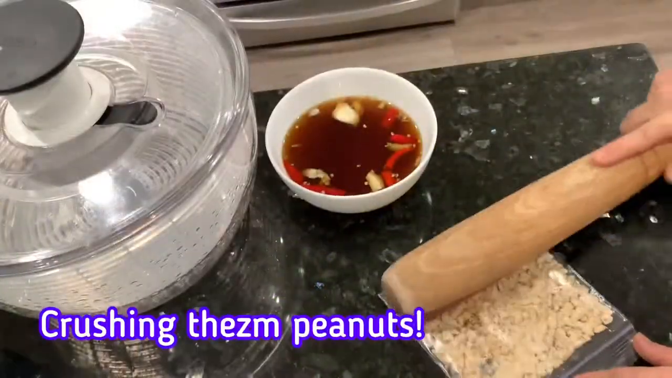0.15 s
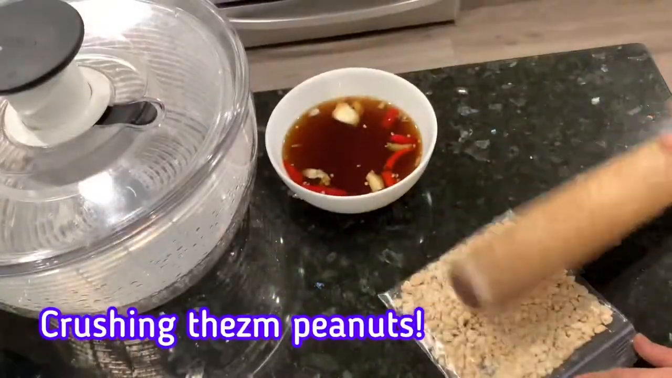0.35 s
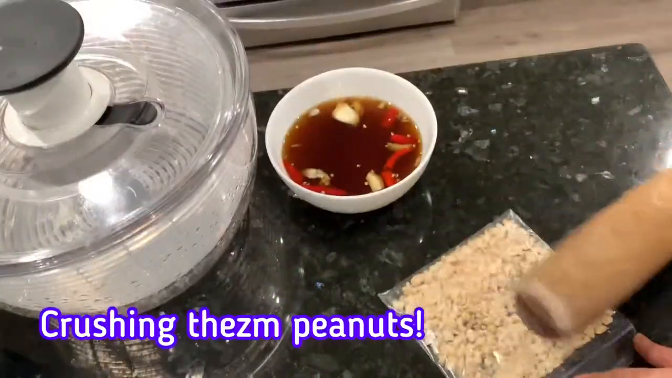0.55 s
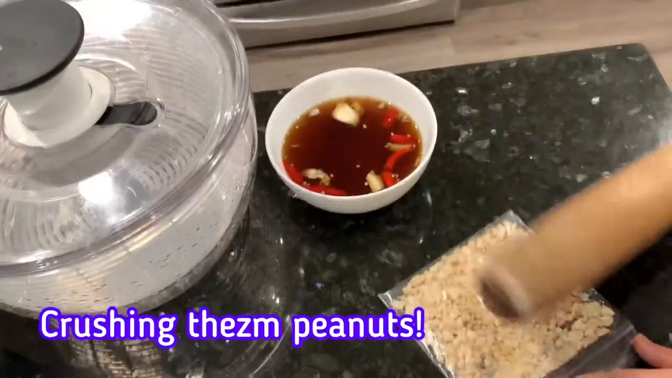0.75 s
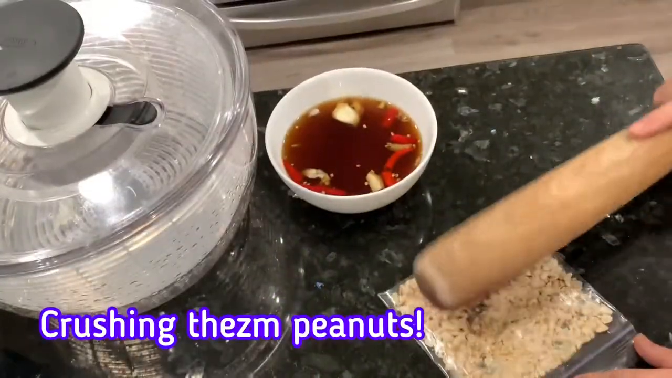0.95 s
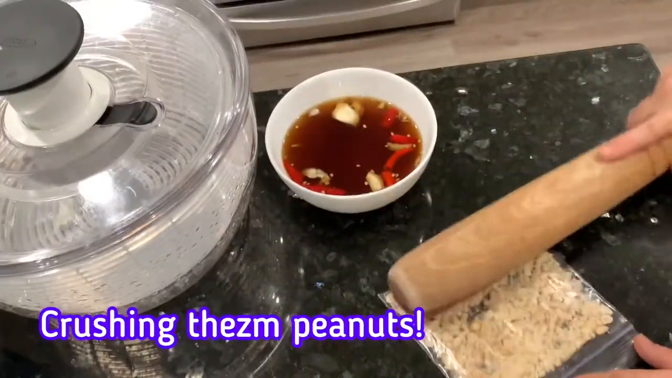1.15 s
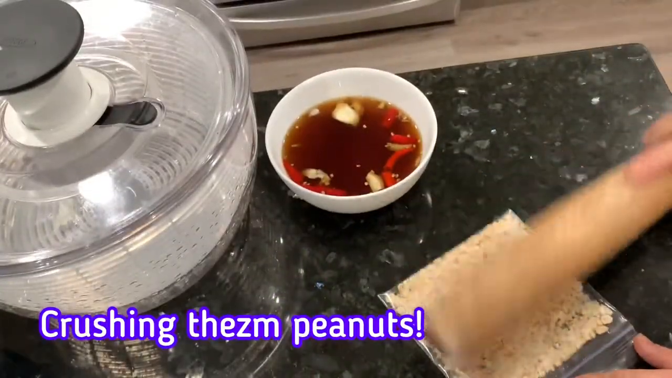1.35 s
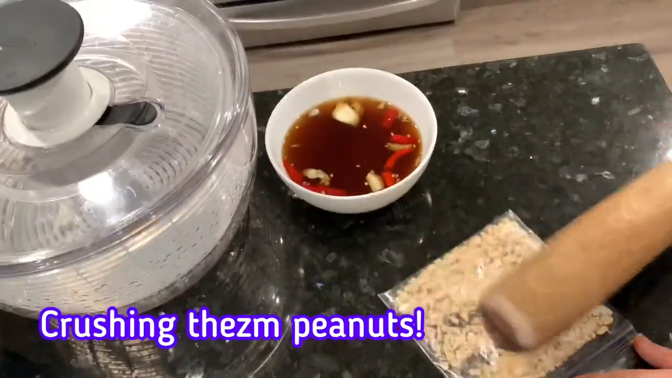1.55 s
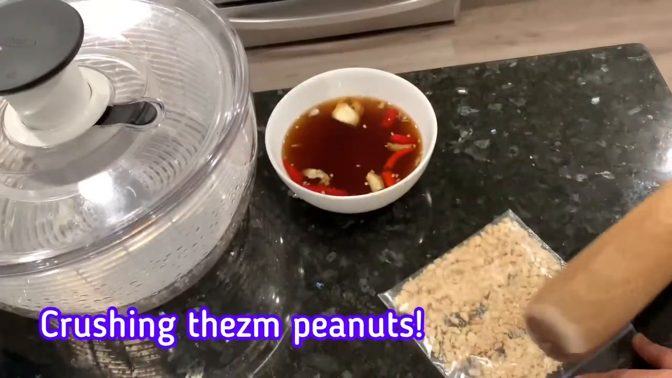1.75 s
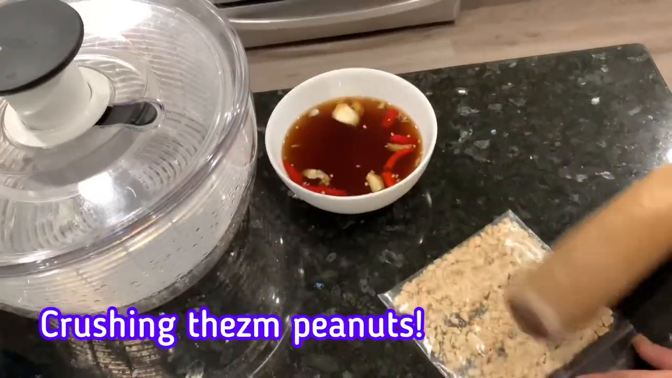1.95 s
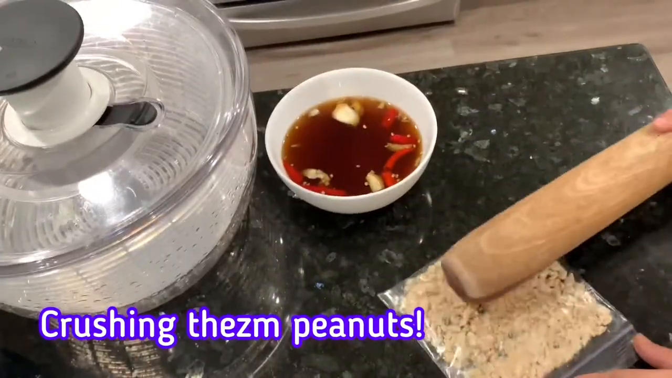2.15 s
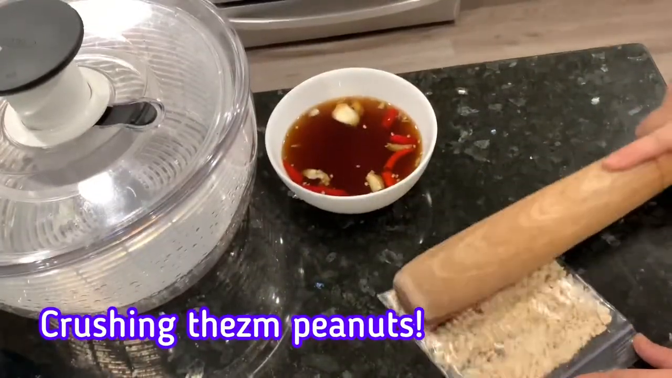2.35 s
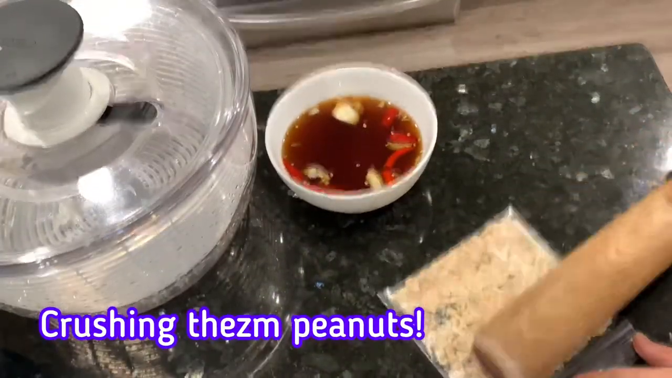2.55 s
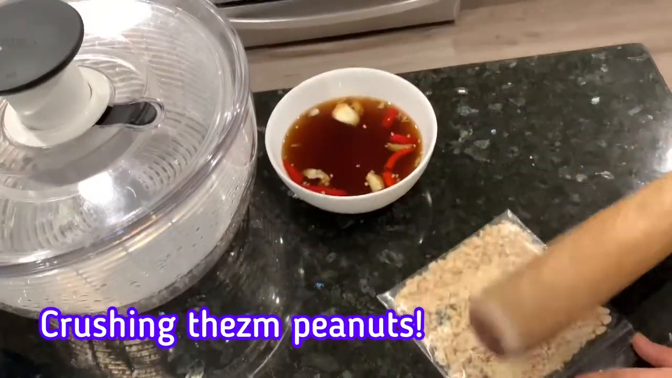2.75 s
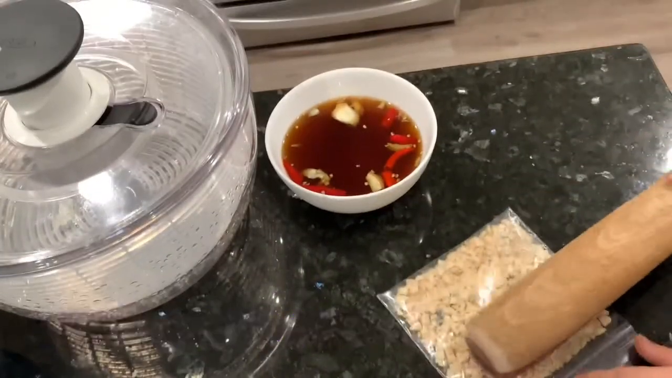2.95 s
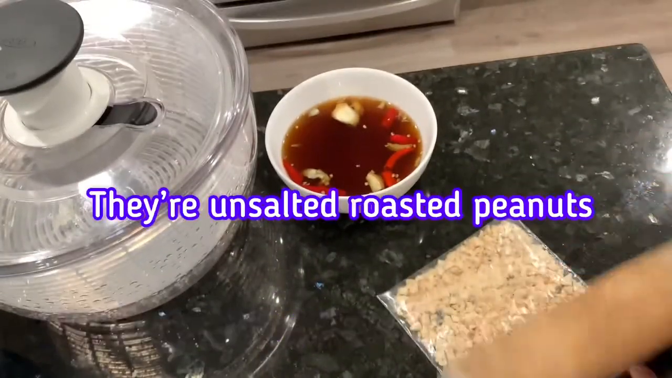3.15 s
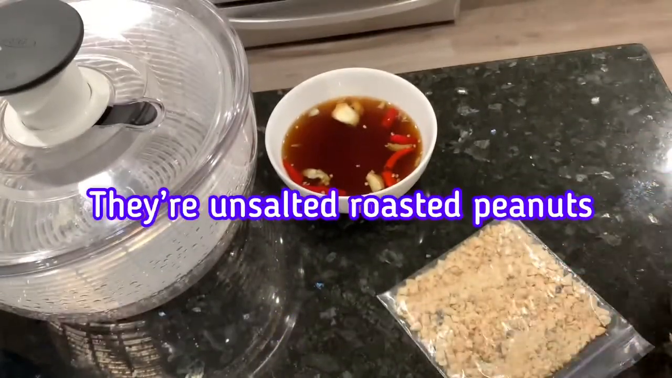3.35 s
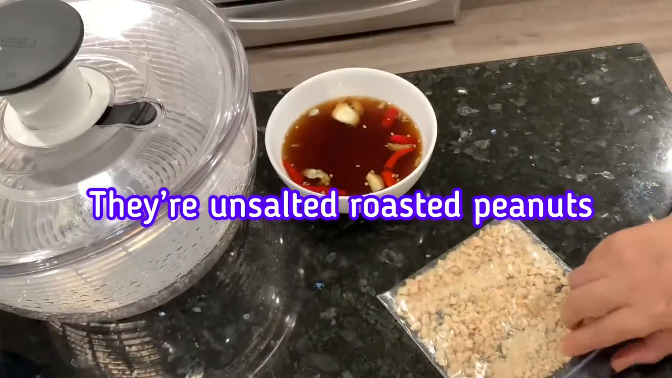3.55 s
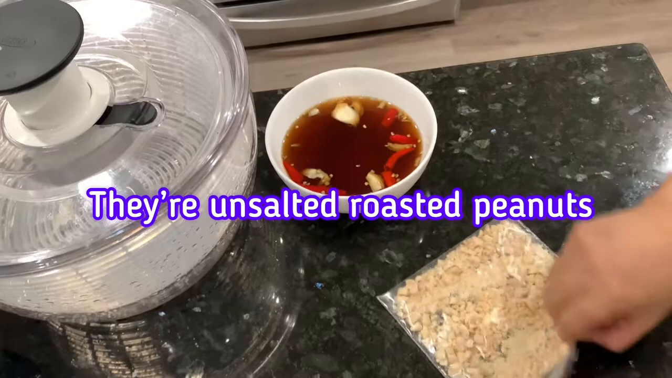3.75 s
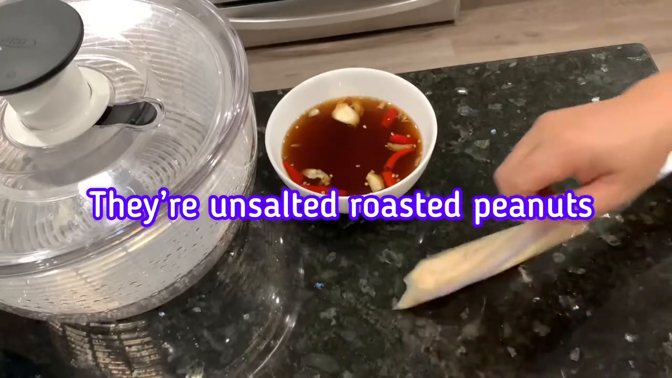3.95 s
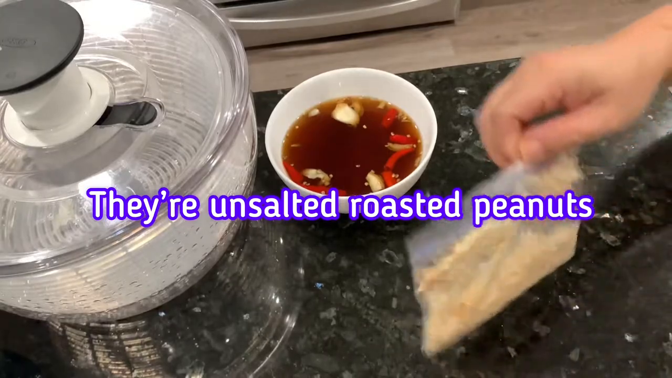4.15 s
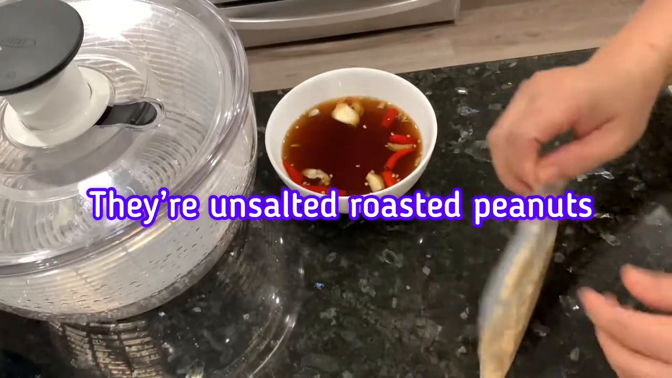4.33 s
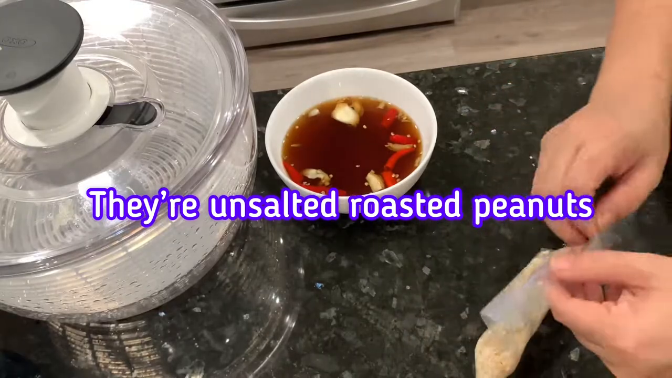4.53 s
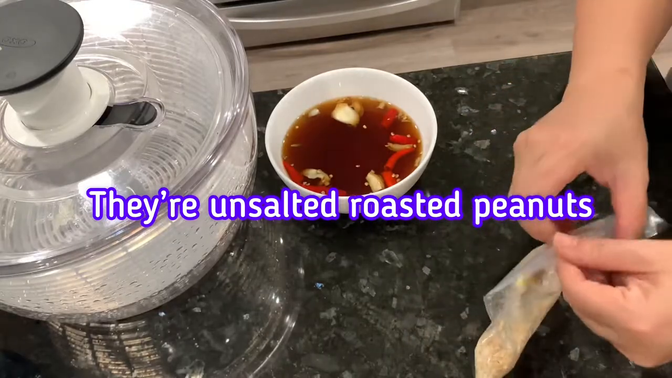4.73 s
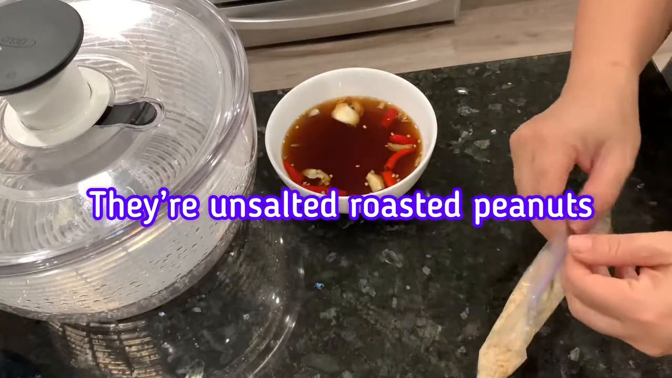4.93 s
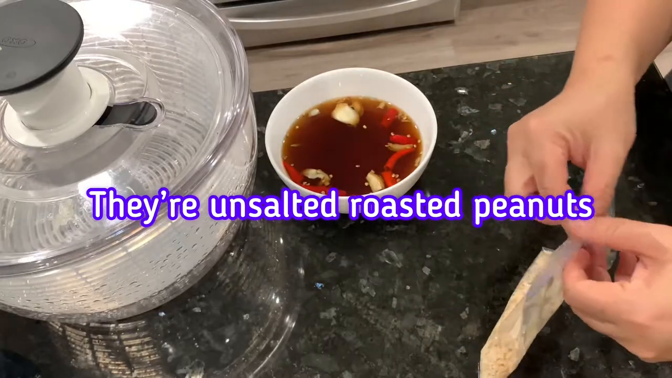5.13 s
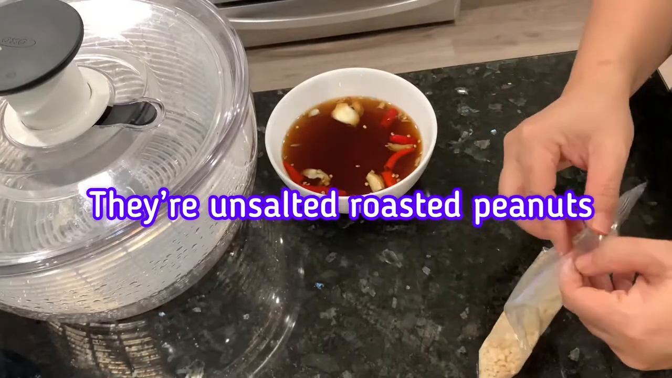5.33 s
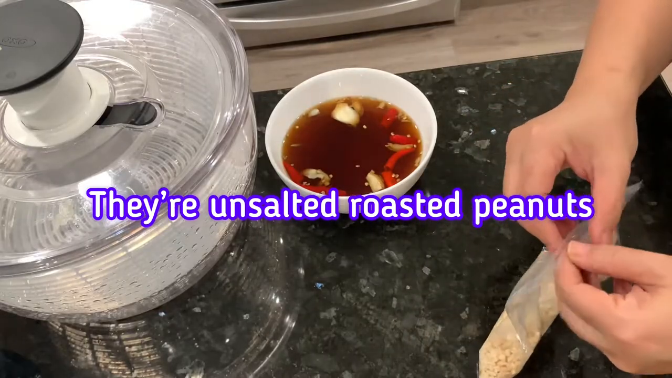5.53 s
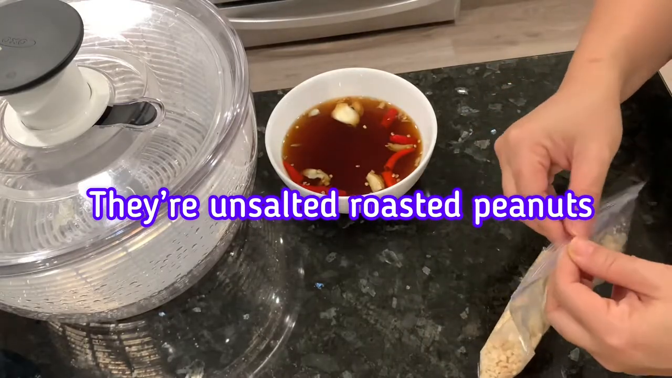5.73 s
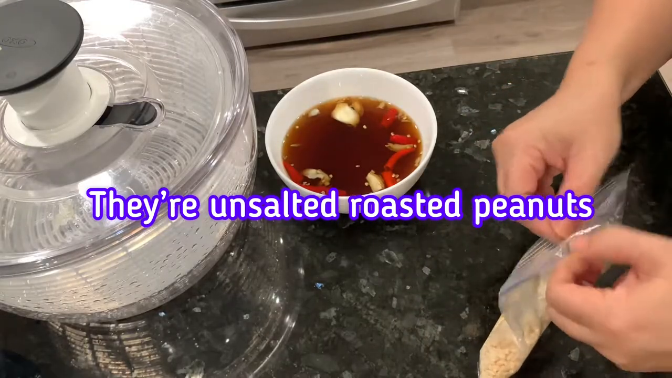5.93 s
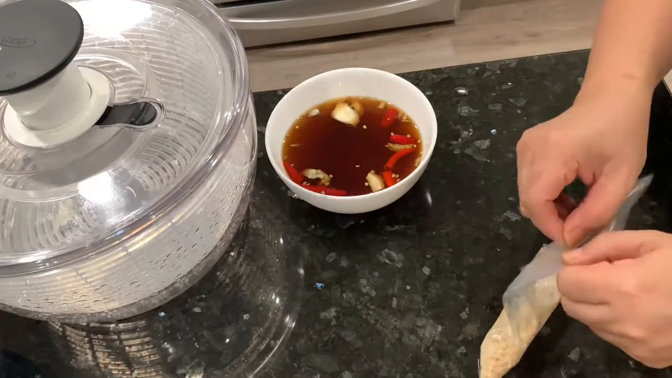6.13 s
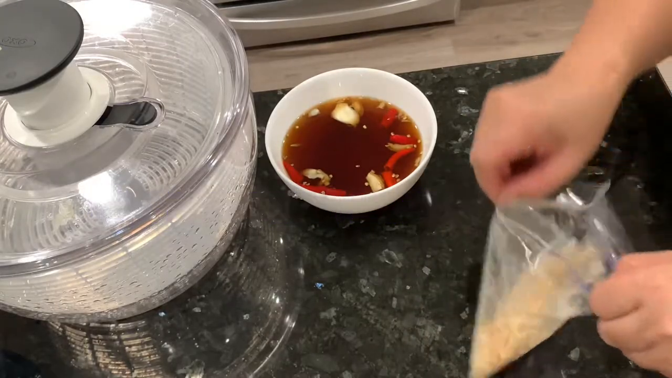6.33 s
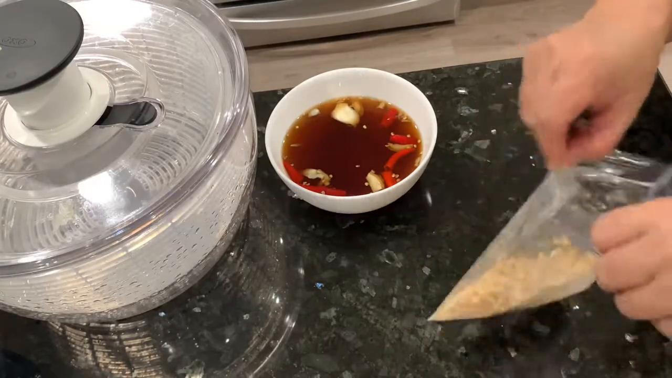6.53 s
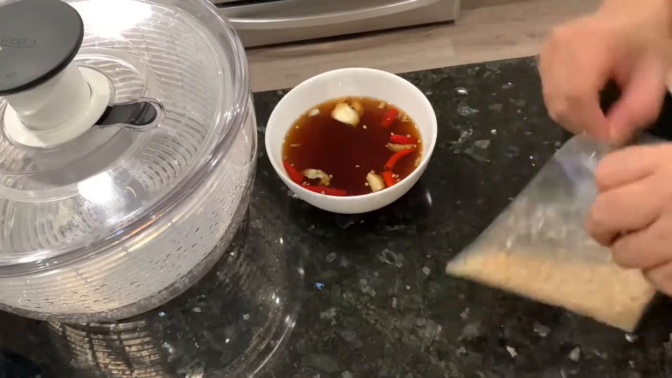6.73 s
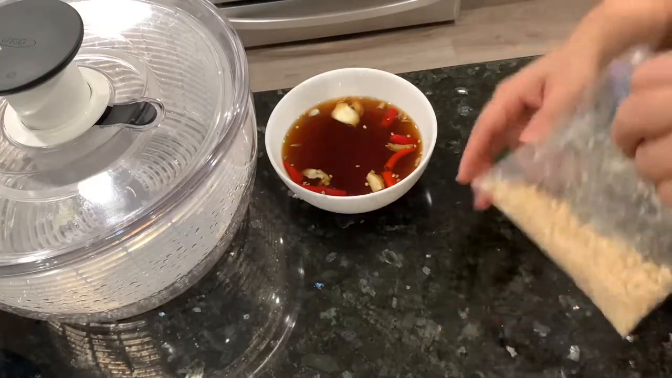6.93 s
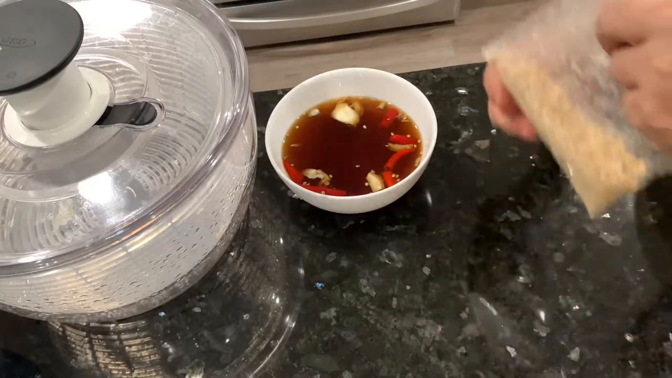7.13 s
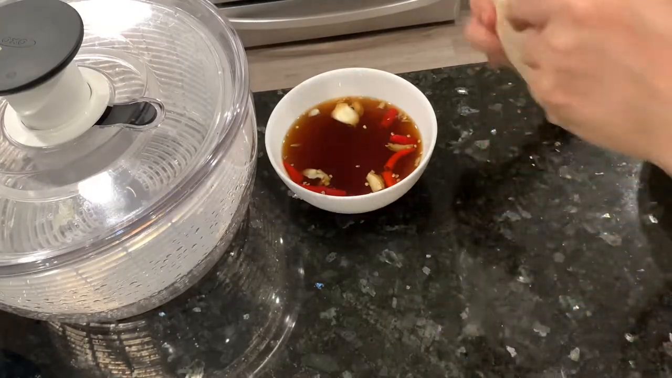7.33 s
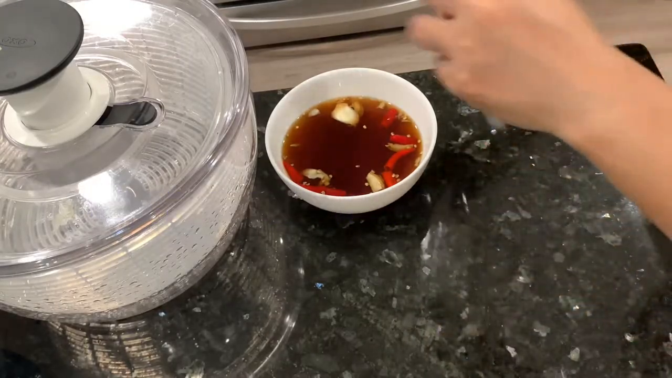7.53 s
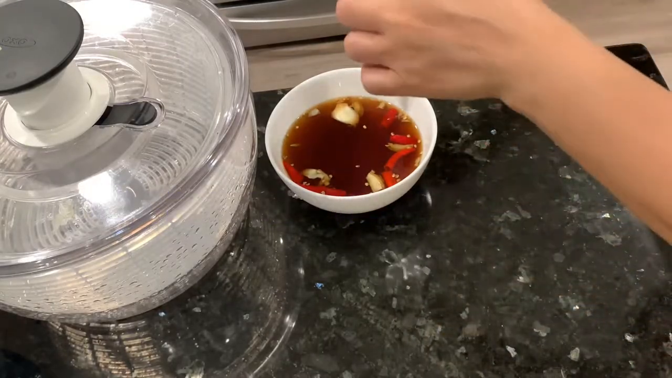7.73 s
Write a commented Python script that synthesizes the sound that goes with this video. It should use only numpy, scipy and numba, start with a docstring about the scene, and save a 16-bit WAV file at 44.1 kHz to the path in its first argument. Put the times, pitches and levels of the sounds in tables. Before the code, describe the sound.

Steady, loud, crunchy wooden blows on bagged nuts ring a stone countertop and echo briefly off bare kitchen walls. After the last blow there is a short gap, a hard wood-on-stone clack with tiny rebounds, then bright plastic rustling with shifting nuts, sharp crackles and soft dull bumps. The bag gives a strong burst of crinkles, then goes nearly quiet. Close stereo phone microphone, faint room hum and rumble.

```python
"""In a hard-walled kitchen a wooden rolling pin pounds a bag of nuts on a stone counter twelve times.
Each blow is a burst of crunching noise and a ring of fading tones; the pin is then laid down with a bounce.
Fingers lift, open and tip the plastic bag: noise in tiny grains rustles, short bursts snap, dull bumps thump.
Fading noise makes the reflections, over faint appliance noise, air and a low rumble.
A phone with two microphone ports listens close by; a limiter holds the loudest peaks down."""
import sys
import numpy as np
from scipy import signal
from scipy.fft import rfft, irfft
from scipy.io import wavfile
from scipy.ndimage import uniform_filter1d, minimum_filter1d
from numba import njit

SR = 44100
rng = np.random.default_rng(int(sys.argv[2]) if len(sys.argv) > 2 else 0)


def volts_from_decibels(level):
    """Turn decibel levels (scalar or array-like) into linear amplitude factors."""
    exponent = np.asarray(level, float) / 20
    return 10 ** exponent


def unload_wav(signal):
    """Save mono or channel-first audio to the path in sys.argv[1] as 16-bit WAV at rate SR, clipped to [-1, 1]."""
    wavfile.write(
        sys.argv[1],
        SR,
        np.round(np.clip(np.atleast_2d(signal).T, -1, 1) * 32767).astype(np.int16),
    )


N = 343098
TIME = np.arange(N) / SR  # seconds

# The kitchen's reflections, band by band; other sounds borrow its bands and likeness:
# (centre [Hz], time to fade by 60 dB [s], relative level [dB], likeness of left and right [0-1])
KITCHEN_BANDS = [(65.3, 0.5, -9, 0.93), (116.7, 0.4, -11.5, 0.6), (292, 0.47, -9.5, 0.9),
                 (472, 0.48, -3.5, 0.3), (1270, 0.63, -1.5, 0), (2110, 0.64, -5, 0.26),
                 (4113, 0.54, -5.5, 0.44), (6940, 0.8, -11, 0.56), (8800, 0.3, -9, 1),
                 (13300, 0.39, -10.5, 0.9)]
# Each grip, pull or shake of the bag; swell and fade are the times for a 20 dB change:
# (peak time [s], swell [s], fade [s], relative film level [dB], relative level of shifting nuts [dB])
BAG_RUSTLES = [(3.16, 0.13, 0.046, -65.5, -65.5), (3.39, 0.023, 0.066, -50, -60),
               (3.701, 0.3, 0.1, -47.5, -49.5), (3.91, 0.21, .1, -38, -45), (4.11, 0.18, .2, -52.5, -52.5),
               (4.31, .04, 0.54, -50, -55), (4.51, 0.25, 0.084, -50, -54.5), (4.67, 0.095, 0.34, -50, -53),
               (4.9, .06, .2, -59, -63), (5.17, 0.27, 0.29, -56.5, -56), (5.5, 0.072, 0.074, -57, -70.5),
               (5.66, 0.033, .1, -52.5, -61.5), (5.74, 0.013, 0.024, -52, -40),
               (5.88, 0.11, .15, -54.5, -61), (5.964, 0.016, 0.089, -40, -56.5),
               (6.125, 0.032, 0.19, -34, -41), (6.3, 0.044, 0.1, -47, -43.5), (6.455, .06, 0.05, -34, -42),
               (6.586, 0.07, 0.058, -36, -42.5), (7.126, .03, .03, -48, -55.5),
               (7.25, 0.16, 0.58, -59, -59), (7.5, .3, 0.15, -59.5, -59.5),
               (7.69, 0.042, 0.097, -61, -60.5)]


def colour(x, points):
    """Shape a sound's tone by points of (frequency [Hz], gain [dB])."""
    hz, db = np.transpose(points)
    f = np.maximum(np.arange(N // 2 + 1) * SR / N, 1)
    gain = volts_from_decibels(np.interp(np.log(f), np.log(hz), db))
    return irfft(rfft(x) * gain, N)


def unit(x):
    """Scale a sound to an average (rms) strength of 1."""
    return x / np.sqrt(np.mean(x ** 2))


def add(out, s, x, pan_db):
    """Mix a short sound into both channels at time s; pan_db is left minus right."""
    i = max(int(s * SR), 0)
    x = x[..., :N - i]
    out[:, i:i + x.shape[-1]] += x * volts_from_decibels(np.array([[pan_db], [-pan_db]]) / 2)


def burst(rise, fall, size):
    """Noise that swells for rise seconds, then dies away by a factor e every fall seconds."""
    t = np.arange(size) / SR
    envelope = np.where(t < rise, (t / rise) ** 2, np.exp(-(t - rise) / fall))
    return rng.standard_normal(size) * envelope


def wander(rate):
    """A level that drifts in straight lines between random values, rate of them per second."""
    step = int(SR / rate)
    held = np.repeat(rng.standard_normal(N // step + 1), step)
    return uniform_filter1d(held, step)[:N]


def pair(like, size):
    """Left and right noise with the given likeness: a shared part plus a part of opposite sign."""
    mid, side = rng.standard_normal((2, size))
    like = np.clip(like, 0, 1)
    opposite = side * np.array([[1], [-1]])
    return (np.sqrt(1 + like) * mid + np.sqrt(1 - like) * opposite) / np.sqrt(2)


def band(x, k):
    """The k-th band of the kitchen table; neighbours cross over at equal power."""
    f = np.maximum(np.arange(N // 2 + 1) * SR / N, 1)
    centres = np.log([row[0] for row in KITCHEN_BANDS])
    share = np.interp(np.log(f), centres, np.arange(len(KITCHEN_BANDS)) == k)
    return irfft(rfft(x) * np.sqrt(share), N)


def background():
    """Faint appliance noise and air drift band by band; a low rumble of bass noise swells and sinks."""
    # tone of the appliance and air: (frequency [Hz], relative level per Hz [dB])
    hum_tone = [(30, -24), (60, -4.5), (100, -4.5), (200, -4.5), (400, -12.5), (800, -17.5), (1600, -21.5),
                (3200, -24), (6400, -40.5), (16000, -52)]
    # course of the rumble, before a small trim: (time [s], level [dB])
    rumble_course = [(3.2, -74.5), (3.45, -57.5), (3.9, -61), (4.2, -68), (5.2, -61), (5.29, -54),
                     (6.05, -70.5), (6.26, -52), (6.5, -63.5), (6.85, -71.5), (7.3, -66.5), (7.66, -80),
                     (7.78, -66.5)]
    air = 0
    for k, row in enumerate(KITCHEN_BANDS):
        air = air + band(pair(row[3], size=N), k) * volts_from_decibels(0.5 * wander(2))
    bass = colour(pair(0.95, size=N), [(20, -28), (45, 0), (90, 4.5), (160, -0.5), (300, -37.0)])
    rumble_db = np.interp(TIME, *np.transpose(rumble_course)) - 1.5
    return volts_from_decibels(-62) * unit(colour(air, hum_tone)) + volts_from_decibels(rumble_db) * unit(bass)


def kitchen(radiated):
    """Reflections off the walls: noise that builds up in about 1 ms and fades at its own pace in each band."""
    tail = 0
    for k, (hz, t60, db, like) in enumerate(KITCHEN_BANDS):
        fade = np.exp(-np.log(1000) * TIME / t60) * np.clip(TIME / 0.00094 - .3, 0, 1)
        tail = tail + volts_from_decibels(db) * unit(fade) * band(pair(like, size=N), k)
    mono = radiated.mean(axis=0)[None]
    return signal.fftconvolve(mono, tail[:, :SR], axes=1)[:, :N] * volts_from_decibels(2.0) / np.sqrt(N)


def handling():
    """Film and nut levels in dB: every rustle swells to its peak and fades; their powers add."""
    power = np.full((2, N), 1e-10)
    for s, swell, fade, film_db, nuts_db in BAG_RUSTLES:
        away = np.where(TIME < s, (s - TIME) / swell, (TIME - s) / fade)
        power += volts_from_decibels(2 * (np.array([[film_db], [nuts_db]]) - 20 * away))  # doubled dB make power
    return 10 * np.log10(power)


def rustle(film_db, nuts_db, film_tone):
    """Dense tiny creases: noise in 1.5 ms grains of very uneven size, for the film and the shifting nuts."""
    film, heap = volts_from_decibels(film_db + 1.8 * wander(40)), volts_from_decibels(nuts_db + 1.8 * wander(40))
    grain_db = 3.5 * np.minimum(rng.exponential(size=(2, N // 66 + 1)), 4)
    creases = rng.standard_normal((2, N)) * volts_from_decibels(grain_db.repeat(66, axis=1)[:, :N])
    nuts_tone = [(150, -26.5), (350, -4.0), (700, -4), (1500, -10.0), (3000, -36.5)]
    # each part of the film's range crackles in clumps of its own, from the 1270 Hz band up
    clumps = 0
    for k in range(4, len(KITCHEN_BANDS)):
        clumps = clumps + band(creases[0], k) * volts_from_decibels(3.5 * wander(25))
    film_sound = film * volts_from_decibels(-0.5) * unit(colour(clumps, film_tone))
    return film_sound + heap * volts_from_decibels(-5.0) * unit(colour(creases[1], nuts_tone))


def tint(x, hz, share):
    """Lean a snap toward the pitch of its own crease by mixing in a narrow band."""
    peak = signal.butter(1, [hz / 1.25, hz * 1.25], "band", fs=SR, output="sos")
    return (1 - share) * x + share * volts_from_decibels(4) * signal.sosfilt(peak, x)


def snaps(film_db, film_tone):
    """Larger creases snap alone: a short tinted burst of treble noise with a lower part under it."""
    # the creases that snap loudest: (time [s], relative level [dB], low part against it [dB])
    loud_snaps = [(3.374, -37.5, -22), (3.3903, -35, -27), (3.6018, -24, -13), (3.6488, -27, -5),
                  (3.698, -26.5, -13.5), (3.7139, -29.5, -11), (3.8329, -35, -11.5), (3.8524, -27, -25),
                  (4.2934, -37.5, -25), (4.3724, -33, -27), (4.4448, -29.5, -12), (4.468, -20, -30.5),
                  (4.5155, -25, -9), (4.565, -26.5, -14), (4.5871, -33.5, -7), (4.8483, -34, -27),
                  (4.8874, -34, -28), (4.8965, -32.5, -28.5), (4.9716, -34.5, -20), (5.0362, -31, -25),
                  (5.0632, -30.5, -30), (5.1277, -28.5, -11), (5.1793, -25, -23), (5.2573, -36.5, -17),
                  (5.654, -43.5, 0.5), (5.734, -22.5, -18.5), (5.7439, -22.5, -14), (5.8145, -35.5, -21.5),
                  (5.886, -37, -14), (5.9618, -25, -9), (6.087, -35, -7.5), (6.111, -10.5, -11.5),
                  (6.1398, -22.5, -15.5), (6.1823, -20, -27), (6.2005, -16.5, -20), (6.2706, -22.5, -18.5),
                  (6.3015, -22.5, -9), (6.4253, -30.5, -1), (6.5234, -23.5, -13), (6.5335, -22, -19),
                  (6.7049, -30, -21), (6.8399, -54, 2), (6.9092, -49, 3.5), (7.1282, -44, 5),
                  (7.218, -44.5, 5), (7.3593, -39, -13), (7.4085, -36, -13.5), (7.6772, -46, 2)]
    high, low = np.zeros((2, N)), np.zeros((2, N))
    # 90 smaller snaps at random times follow the level of the film rustle
    when = rng.uniform(BAG_RUSTLES[0][0], TIME[-1], 90)
    chance = rng.standard_normal((90, 2))
    small_db = np.interp(when, TIME, film_db) + 10 + 4.5 * chance[:, 0]
    small_low_db = -12.5 + 7 * chance[:, 1]
    for s, db, low_db in list(loud_snaps) + list(zip(when, small_db, small_low_db)):
        pan_db = -2 + 3 * rng.standard_normal()
        pitch = 5500 * 2 ** rng.uniform(-1.15, 1)  # Hz
        add(high, s, volts_from_decibels(db + 6) * tint(burst(0.00087, 0.0022, size=500), pitch, .6), pan_db)
        add(low, s, volts_from_decibels(db + low_db + 7.5) * burst(0.00066, 0.0033, size=500), pan_db)
    fold_tone = [(200, -30), (600, -3), (1800, 0), (3000, -5), (6000, -25)]
    return colour(high, film_tone) + colour(low, fold_tone)


def bumps():
    """Bag and hands bump softly on the stone: short noise kept to a band around each bump's pitch."""
    # the soft bumps: (time [s], relative level [dB], pitch [Hz])
    soft_bumps = [(3.308, -51, 250), (4.091, -43, 560), (4.68, -46.5, 650), (4.709, -51, 720),
                  (5.302, -51.5, 90.3), (6.243, -41.5, 145), (6.604, -44.5, 297.5)]
    out = np.zeros((2, N))
    for s, db, hz in soft_bumps:
        dull = signal.butter(2, [hz * .6, hz * 1.6], "band", fs=SR, output="sos")
        thump = signal.sosfilt(dull, burst(0.0045, 0.012, size=4000))
        add(out, s, volts_from_decibels(db - 11.0) * unit(thump), 0)
    return out


def bag():
    """The handled plastic bag: rustling creases, single snaps and soft bumps add up."""
    # tone of the plastic film: (frequency [Hz], relative level per Hz [dB])
    film_tone = [(710, -35), (1200, -8), (7000, -8.5), (8640, -5), (10800, -10), (13300, -12.5),
                 (15600, -11.5), (16300, -36.5), (17000, -74)]
    film_db, nuts_db = handling()
    return rustle(film_db, nuts_db, film_tone) + snaps(film_db, film_tone) + bumps()


def smack(top_hz, low_hz, fall):
    """The first bending wave through the slab: one short sweep from high to low."""
    t = np.arange(600) / SR
    hz = low_hz + (top_hz - low_hz) * np.exp(-t / fall)
    wave = np.sin(2 * np.pi * np.cumsum(hz) / SR)
    return wave * (1 - np.exp(-t / 0.00034)) * np.exp(-t / .003)


def body_ring(knock_db, thud_db, clack_db, top_ring_db, travel, contact, damp):
    """One blow rings counter, cabinet and pin: many fading tones, the high ones arriving before the low."""
    # ways the body rings: (frequency [Hz], relative level [dB], fade by 60 dB before damping [s])
    body_modes = [(64, 0.5, 0.032), (76.8, -2, 0.29), (87.4, 3.5, 0.19), (138.9, 1, 0.38),
                  (195, 10.5, 0.083), (250, -5.5, 0.026), (314.5, -10.5, 0.14), (355.6, -7, 0.097),
                  (419.4, 1, 0.055), (467, -1.5, 0.059), (511, 7, 0.051), (542, -4, 0.13),
                  (641.5, -1, 0.045), (678.2, 0, 0.045), (792.4, -10.5, 0.098), (847, 2, 0.027),
                  (968, -12, 0.033), (1086.6, -7.5, 0.1), (1291, 5.5, 0.03), (1430, -4, 0.087),
                  (1650, 8.5, 0.012), (2080, -9, 0.031), (2110, -1.5, 0.039), (2268, -5, 0.026),
                  (2250, -4.5, 0.02), (3140, -8.5, 0.072)]
    hz, mode_db, t60 = np.transpose(body_modes)[:, :, None]
    t = np.arange(SR // 2) / SR
    chance = rng.standard_normal((3, len(body_modes), 1))
    group_db = np.where(hz < 300, thud_db, np.where(hz < 1000, knock_db, clack_db))
    # bending speed grows with the root of pitch
    late = np.maximum(t - contact - travel / np.sqrt(hz), 0)
    # every blow lands elsewhere and weights the modes afresh
    level_db = group_db + mode_db - 3.5 + top_ring_db * (hz / 3000) ** 3 + 2.7 * chance[1]
    # the contact pushes for a moment, so each mode swells in
    swell = 1 - np.exp(-late * hz / 0.15)
    size = volts_from_decibels(level_db) * swell * np.exp(-np.log(1000) * late * damp / t60)
    # a wide slab radiates each higher mode with its own phase toward either port
    skew = 0.57 * np.clip(hz / 400, 0, 1) * chance[2]
    turn = 2 * np.pi * hz * (1 + 0.0087 * chance[0]) * late
    return np.array([(size * np.sin(turn + side * skew)).sum(axis=0) for side in (1, -1)])


def pin(blows, pan_db, top_ring_db, travel, rise, contact, damp):
    """Blows of the pin crunch in noise bursts and ring the body; gives the near sound and what the walls get."""
    # tone of the crunch: (frequency [Hz], relative level per Hz [dB])
    crunch_tone = [(470, -37.5), (800, -12), (2000, -10.5), (3200, -11), (4500, -12.5), (7000, -12),
                   (11400, -16.5), (14000, -22), (16000, -25.5), (17000, -49)]
    ring, crack_wave, crack, spread, click, clack = np.zeros((6, 2, N))
    for s, crunch_db, knock_db, thud_db, clack_db in blows:
        tones = body_ring(knock_db, thud_db, clack_db, top_ring_db, travel, contact, damp)
        add(ring, s, tones, pan_db)
        first_wave = volts_from_decibels(knock_db - 5.5) * smack(2387, 620, .0016)
        add(crack_wave, s + contact + 0.001485, first_wave, pan_db)
        # a faint noise swells for 12 ms before each blow and softens its attack
        add(crack, s - .012, volts_from_decibels(crunch_db - 19.5) * burst(.012, 0.0022, size=900), pan_db / 2)
        # one sharp crack, then crumbs and film go on crunching
        crunch = burst(rise, 0.0033, size=4000) + volts_from_decibels(-13.5) * burst(0.0089, 0.014, size=4000)
        add(crack, s - .0008, volts_from_decibels(crunch_db) * crunch, pan_db / 2)
        # nuts break left and right of the pin, so the ports differ in the middle range
        opposite = burst(rise, 0.0013, size=900) * np.array([[1], [-1]])
        add(spread, s - .0008, volts_from_decibels(crunch_db) * opposite, 0)
        add(click, s + rise, volts_from_decibels(crunch_db) * np.ones(1), 0)
        add(clack, s + rise, volts_from_decibels(clack_db) * np.ones(1), 0)
    crack = crack + volts_from_decibels(-1) * colour(spread, [(4500, 2.0), (7500, -30.0)])
    near = ring + crack_wave + volts_from_decibels(14) * colour(crack, crunch_tone)
    # summed over all directions crack and clack are even clicks, and only the lower modes stand out
    clack_tone = [(400, -20.5), (900, 1.5), (1800, -4), (3200, -12.5), (6000, -40.0)]
    even = volts_from_decibels(30) * colour(click, crunch_tone) + volts_from_decibels(26) * colour(clack, clack_tone)
    low_ring = colour(ring, [(300, 0.5), (530, -1.5), (900, -5.5), (1800, -10)])
    return np.array([near, low_ring + even])


def scene():
    """Pin and bag close by, their reflections off the walls, and the background."""
    # pin on the nuts; all levels are relative:
    # (time [s], crunch level [dB], knock level [dB], thud level [dB], clack level [dB])
    nut_blows = [(0.0094, -9, -18, -22.5, -21.5), (0.2675, -13.5, -7, -17, -10),
                 (0.4914, -12, -4.5, -19, -10), (0.7453, -8.5, -8, -16.5, -8.5),
                 (0.9931, -7, -5.5, -17, -8), (1.2555, -13, -9.5, -18.5, -17.5),
                 (1.4837, -13.5, -7.5, -18.5, -10.5), (1.703, -15, -6.5, -18.5, -7.5),
                 (1.949, -11, -4.5, -22, -9), (2.2065, -7.5, -15, -20.5, -31.5),
                 (2.429, -11.5, -4, -19, -7), (2.6696, -12, -4, -18.5, -6)]
    # pin laid on bare stone, then its bounces; all levels are relative:
    # (time [s], crunch level [dB], knock level [dB], thud level [dB], clack level [dB])
    laid_blows = [(3.4972, -29.5, -10, -29, -8.5), (3.5193, -27, -16, -36.5, -12),
                  (3.545, -41.5, -24.5, -28.5, -29), (3.567, -43, -34.5, -40.5, -50)]
    # times in seconds; the nuts take off some of the pin's top ring, bare stone brings it out
    pounding = pin(nut_blows, pan_db=0.5, top_ring_db=-4.0, travel=.06, rise=0.0028,
                   contact=0.001553, damp=1.09)
    laying = pin(laid_blows, pan_db=0.5, top_ring_db=4.0, travel=0.022, rise=0.001,
                 contact=-0.00055, damp=0.87)
    near, radiated = pounding + laying + bag()  # the bag goes into both
    return near + kitchen(radiated) + background()


@njit
def hold(x, top, release):
    """Limiter gain that keeps peaks under top and recovers slowly."""
    gain, level = np.empty(len(x)), 0.
    for i in range(len(x)):
        level = max(x[i], level * release)
        gain[i] = top / max(level, top)
    return gain


def band_limit(x):
    """A steep low-pass at the top of the band."""
    return signal.sosfilt(signal.butter(12, 17150, fs=SR, output="sos"), x)


def record(dry):
    """Stereo processing turns the left phase, the ports cut deep bass, a limiter looks 1 ms ahead."""
    # stereo processing turns the left treble's phase: (frequency [Hz], phase lag [rad])
    left_phase = [(0, 0), (1000, .25), (4400, .9), (6500, 1.5), (8550, np.pi), (13400, 3 * np.pi),
                  (17000, 13.9)]
    # the left port against the right: (frequency [Hz], gain [dB])
    port_tone = [(60, 3.5), (125, 1), (500, 3), (1200, .3), (4000, -2.5), (8000, .1)]
    lag = np.interp(np.arange(N // 2 + 1) * SR / N, *np.transpose(left_phase))
    left = colour(irfft(rfft(dry[0]) * np.exp(-1j * lag), N), port_tone)
    bass_cut = signal.butter(7, 58, "high", fs=SR, output="sos")
    ports = signal.sosfilt(bass_cut, [left, dry[1]])
    # the largest size of either channel within 1 ms before or after
    peak = -minimum_filter1d(-np.abs(ports).max(axis=0), size=89)
    release = np.exp(-1 / (0.0038 * SR))  # recovers over 3.8 ms
    gain = uniform_filter1d(hold(peak, .87, release), size=45)
    return band_limit(ports * gain)


dry = scene()
out = record(dry)
unload_wav(out)
```